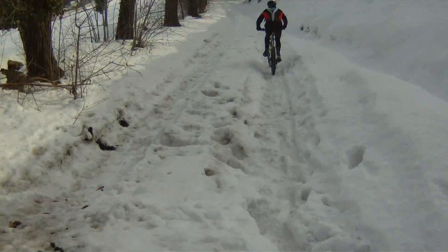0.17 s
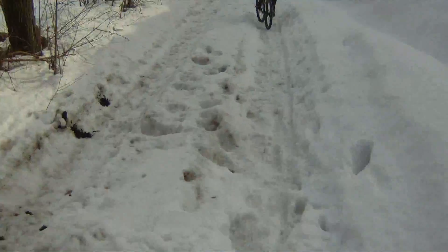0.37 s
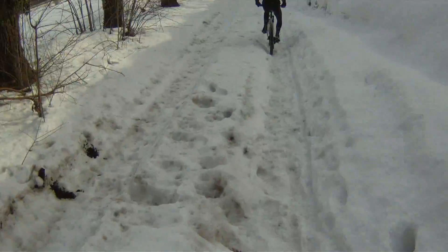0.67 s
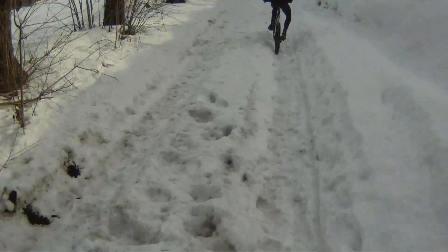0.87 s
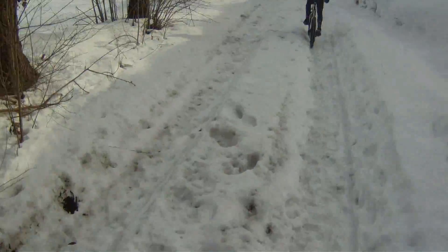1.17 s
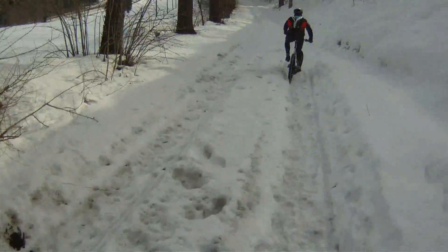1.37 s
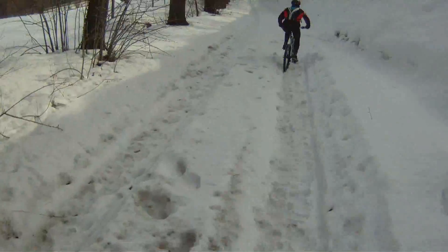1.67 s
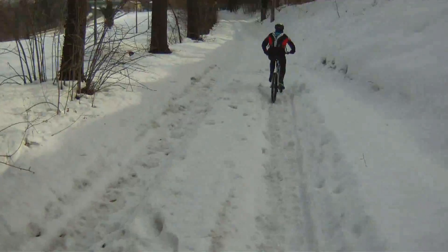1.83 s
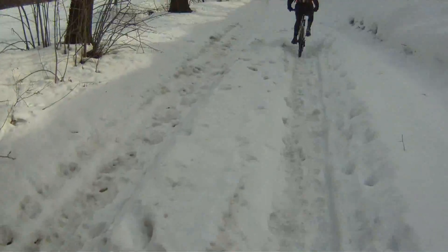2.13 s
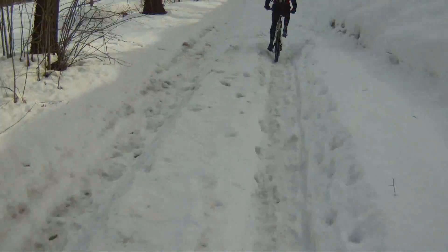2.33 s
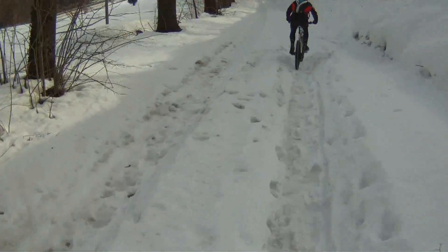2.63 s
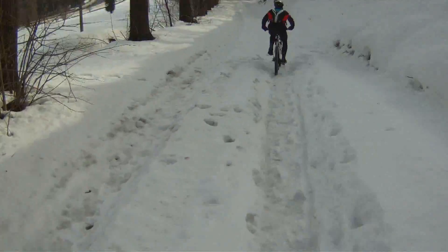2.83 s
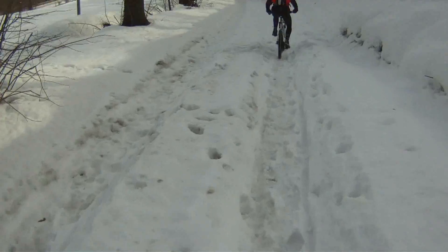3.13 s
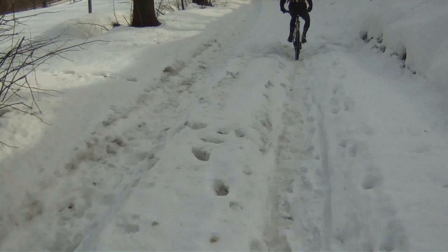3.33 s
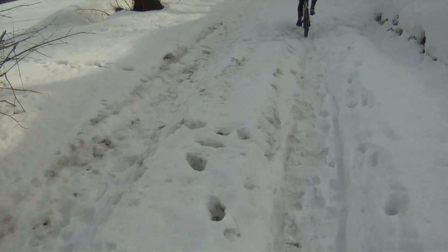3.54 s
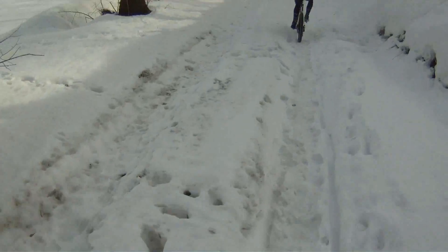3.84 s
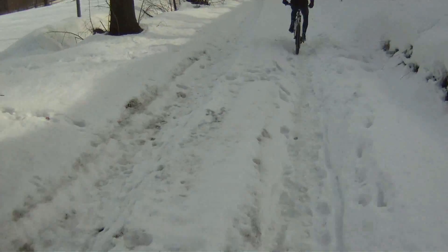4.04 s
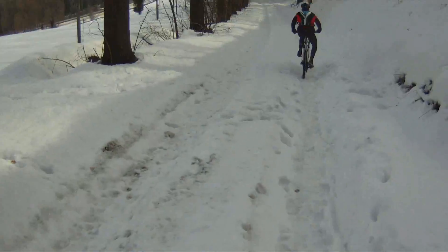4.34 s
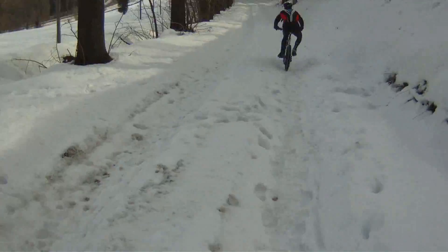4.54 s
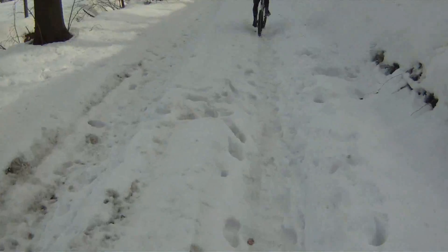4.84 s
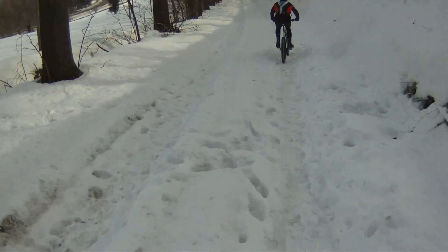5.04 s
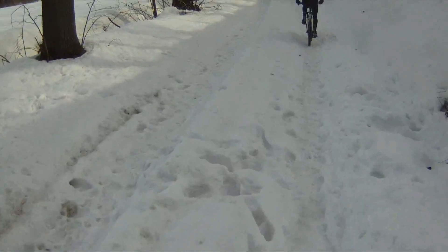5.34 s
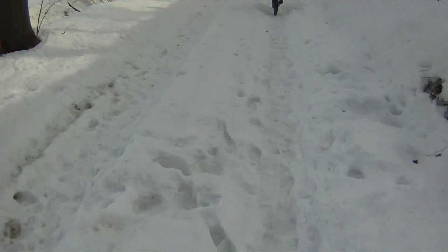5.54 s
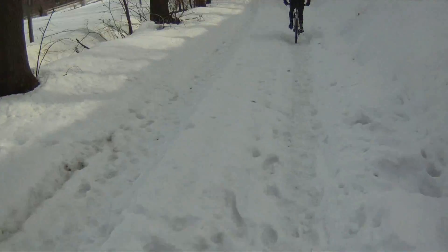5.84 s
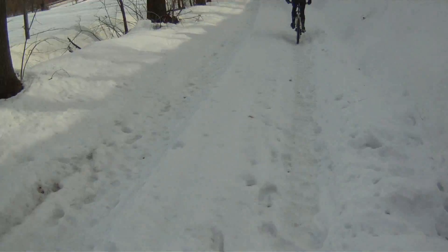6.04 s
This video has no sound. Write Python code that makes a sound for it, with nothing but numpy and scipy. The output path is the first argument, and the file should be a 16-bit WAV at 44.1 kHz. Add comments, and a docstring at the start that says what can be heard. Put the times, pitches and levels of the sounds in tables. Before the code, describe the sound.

A bike rolls over rough, snowy ground: constant uneven crunch, icy crackle and little dull blips as snow lumps give way. After a second of tyres alone, a loose part begins knocking, with short rattles and a few bright metal clacks, then eases mid-way before returning around four to five seconds. The on-bike microphone is close and dry, almost mono, with gusty low wind and faint electronic hiss and ticking.

```python
"""On a rutted track of packed snow, a mountain bike rolls along, heard from a camera riding on it.
Grain bursts shaped as dull crunch and icy grit make the tyres; swells are ridges, blips are bursting lumps.
Filtered noise makes wind, hiss and flying ice; filtered grains make soft low swells in the crunch.
A loose part knocks in ringing modes with rough snaps and rattling repeats; some knocks get a bright clack.
The mix is boxy, dry and nearly mono."""
import sys
import numpy as np
from scipy import signal
from scipy.fft import rfft, irfft
from scipy.io import wavfile
from scipy.ndimage import uniform_filter1d

SR = 44100
rng = np.random.default_rng(int(sys.argv[2]) if len(sys.argv) > 2 else 0)


def wav_out(sig):
    """Save sig, one row per channel (or a flat mono array), as 16-bit PCM at SR to the path in sys.argv[1]."""
    wavfile.write(sys.argv[1], SR, np.round(np.clip(np.atleast_2d(sig).T, -1, 1) * 32767).astype(np.int16))


N = 273420
T = np.arange(N) / SR


def amp(db):
    """Decibels to gain."""
    return 10 ** (np.asarray(db) / 20)


def unit(x):
    """Scales to an rms of one."""
    return x / np.sqrt(np.mean(x ** 2) + 1e-20)


def add(mix, s, sound):
    """Mixes a sound in at s seconds."""
    part = mix[max(round(s * SR), 0):][:len(sound)]
    part += sound[:len(part)]


def colour(x, spectrum, tilt_db=0, size=4096):
    """Minimum-phase filter with the given spectrum, so that each click rings after it lands."""
    hz, db = np.transpose(spectrum)
    tilted_db = db + tilt_db * np.log2(hz / hz[0])  # tilt in dB per octave
    octave = np.log2(np.fft.rfftfreq(size, 1 / SR) + 1)  # the 1 Hz shift avoids log of zero
    log_gain = np.log(amp(np.interp(octave, np.log2(hz), tilted_db)))
    circle = np.concatenate([log_gain, log_gain[-2:0:-1]])
    response = np.fft.ifft(np.exp(np.conj(signal.hilbert(circle)))).real
    return signal.oaconvolve(x, response[:size // 2])[:len(x)]


def wander(hz):
    """Smooth random curve of unit rms, its spectrum fading out around hz."""
    fade = np.exp(-(np.fft.rfftfreq(N, 1 / SR) / hz) ** 2)
    return unit(irfft(rfft(rng.standard_normal(N)) * fade, N))


def grains(per_s, spread_db):
    """Tiny fractures at random moments, most small and a few large."""
    size = amp(spread_db * np.minimum(rng.exponential(1, N), 4))
    polarity = rng.choice([-1, 1], N)
    return size * polarity * (rng.random(N) < per_s / SR)


def swell(at, db, length, rise=0.31):
    """Gain of one crush: a smooth rise over a share of its length, then a slower crumble."""
    phase = (T - at) / length
    near = (phase > -rise) & (phase < 1 - rise)
    side = np.where(phase[near] < 0, rise, 1 - rise)
    gain = np.zeros(N)
    gain[near] = np.cos(np.pi / 2 * phase[near] / side) ** 2
    return amp(db) * gain


# Tyres rolling on level snow between ridges: t/s, dull crunch level/dB, icy grit level/dB before trim
ROLLING_BED = [(0.0, -47, -56.5), (0.45, -49, -59), (0.75, -53.5, -65.5), (1.0, -46.5, -53.5),
               (1.22, -48, -65), (1.45, -47, -59.5), (2.1, -47.5, -58), (2.6, -48, -60.0),
               (3.15, -53.5, -64), (3.7, -47, -60.0), (4.3, -50.5, -61.5), (4.6, -46, -60), (5.7, -52, -64),
               (6.2, -47.5, -60.0)]
# A tyre crushes a ridge of snow: t/s at its height, level/dB, length/s, grit level/dB relative to crunch
RIDGE_CRUSHES = [(0.05, -45, 0.091, -9), (0.07, -44.5, 0.35, -12), (0.27, -41.5, 0.16, -10),
                 (0.356, -45.5, 0.17, -6), (0.522, -48, 0.059, -4.5), (0.595, -43, 0.15, -9.5),
                 (0.683, -42.5, 0.058, -22), (0.786, -41.5, 0.083, -15.5), (0.882, -41, 0.095, -10.5),
                 (0.978, -45.5, 0.202, -15), (1.025, -47, 0.074, -6), (1.103, -43.5, 0.15, -8),
                 (1.272, -42.0, 0.064, -7.5), (1.31, -41, 0.091, -12), (1.354, -43.5, 0.13, -14),
                 (1.44, -40, 0.083, -11.5), (1.523, -44.5, 0.16, -13), (1.641, -45.5, 0.088, -10.5),
                 (1.713, -42.5, 0.13, -14), (1.806, -42.0, 0.116, -11), (1.887, -39, 0.09, -12.5),
                 (1.977, -36, 0.027, -14), (2.157, -40.5, 0.039, -13), (2.194, -41.5, 0.1, -12),
                 (2.272, -38, 0.1, -13), (2.352, -45.5, 0.243, -14.5), (2.637, -46.5, 0.33, -18),
                 (2.682, -39, 0.064, -10.5), (2.793, -47, 0.11, -19), (2.899, -36.5, 0.055, -13.5),
                 (2.989, -41, 0.048, -12), (3.03, -43.5, 0.091, -12), (3.088, -41, 0.016, -12.5),
                 (3.203, -49.5, 0.18, -14), (3.301, -46, 0.06, -11), (3.371, -49.5, 0.16, -8.5),
                 (3.524, -44.5, 0.079, -11), (3.597, -42.5, 0.092, -18), (3.662, -44.5, 0.11, -10),
                 (3.726, -40, 0.051, -12), (3.783, -47, 0.23, -15), (3.999, -40.5, 0.1, -14.5),
                 (4.089, -42, 0.17, -15), (4.178, -42.5, 0.18, -13.5), (4.383, -44.5, 0.04, -6),
                 (4.44, -38.5, 0.077, -10.5), (4.559, -44.5, 0.2, -10), (4.724, -49.5, 0.36, -8),
                 (4.884, -49.0, 0.035, -4), (5.03, -42.5, 0.073, -10), (5.109, -44.5, 0.053, -10),
                 (5.193, -44, 0.2, -17), (5.333, -37, 0.16, -14.5), (5.425, -42, 0.12, -14),
                 (5.547, -45.5, 0.27, -12.5), (5.648, -45, 0.04, -8), (5.735, -44.5, 0.055, -14),
                 (5.79, -43.5, 0.16, -12.5), (5.914, -37.5, 0.037, -10.5), (6.01, -50, 0.41, -7.5),
                 (6.099, -41.5, 0.041, -15)]


def crushing():
    """How hard the tyres work the snow: rolling and ridge powers add up to gains for crunch and grit."""
    s, dull_db, icy_db = np.transpose(ROLLING_BED)
    dull_power = amp(np.interp(T, s, dull_db)) ** 2
    icy_power = amp(np.interp(T, s, icy_db)) ** 2
    for at, db, length, gritty_db in RIDGE_CRUSHES:
        power = swell(at, db, length) ** 2
        dull_power = dull_power + power
        icy_power = icy_power + power * amp(gritty_db) ** 2
    return np.sqrt(dull_power), np.sqrt(icy_power)


# Tone of the dull crunch: f/Hz, relative level/dB per Hz
CRUNCH_TONE = [(40, -28.5), (130, -19.5), (210, -15), (290, -7), (420, -8), (570, -6.5), (780, 0.5),
               (980, 0.5), (1250, -4.5), (1520, -11.5), (1900, -11), (2250, -43), (3200, -52), (8000, -46)]
# Tone of the icy grit: f/Hz, relative level/dB per Hz
GRIT_TONE = [(900, -17), (1600, -3), (1950, 11), (2350, 4), (2800, 2), (3150, 2.5), (3500, -0.5),
             (4200, 6.5), (4750, -0.5), (5450, 1), (6200, -14), (7400, -17.5), (9500, -20.5),
             (15000, -39.5)]


def tyres(dull, icy, clump_db=2.0, clump_hz=75, grit_trim_db=-1, shared=0.74, crust_db=-8):
    """Snow breaks in clumps of grains among sparse crust cracks: a dull crunch with icy grit on top."""
    clumps = amp(clump_db * wander(clump_hz))
    breaks = unit(grains(per_s=4500, spread_db=2.5) * clumps)
    breaks = breaks + amp(crust_db) * unit(grains(per_s=35, spread_db=1.8))
    crystals = unit(grains(per_s=6800, spread_db=4.5) * clumps)
    crunch = dull * unit(colour(breaks, CRUNCH_TONE))
    # The same breaks feed both layers, which glues grit to crunch
    grit = icy * unit(colour(crystals + shared * breaks, GRIT_TONE))
    return crunch + amp(grit_trim_db) * grit


# Wind on the camera: t/s, level/dB before trim and roughness
WIND_LEVEL = [(0, -62), (1.75, -65), (2.0, -66.5), (3.05, -64), (3.3, -59), (4.2, -69.5), (5.3, -64.5),
              (6.2, -69)]
# Tone of the wind: f/Hz, relative level/dB per Hz
WIND_TONE = [(15, 0.5), (40, -3.5), (90, -5), (170, -4.5), (350, -14.5), (1000, -60)]


def rumble(dull, trim_db=-1, gust_db=2, follow=0.43):
    """Wind shakes the camera as gusty low noise, more so where the tyres crunch harder."""
    roughness = unit(uniform_filter1d(dull, size=5000)) ** follow  # smoothed over 0.11 s
    level = roughness * amp(trim_db + np.interp(T, *np.transpose(WIND_LEVEL)))
    gusts = amp(gust_db * wander(hz=21))
    return level * unit(colour(rng.standard_normal(N), WIND_TONE) * gusts)


# Tone of the camera's electronics: f/Hz, relative level/dB per Hz
HISS_TONE = [(300, 0), (2500, 0), (7000, 0), (10000, -1), (14900, 0), (15600, -25)]
# The camera's two ticks in each picture: first t/s of each
TICK_STARTS = (.02235, .02335)


def hiss(level_db=-74.5, apart_db=-15, tick_db=-52, pictures_per_s=29.968):
    """The camera's electronics hiss, spread mostly in the treble, and click twice per picture."""
    common, apart = (unit(colour(noise, HISS_TONE)) for noise in rng.standard_normal((2, N)))
    apart = unit(np.gradient(apart))  # the slope favours treble
    ticks = np.zeros(N)
    for first in TICK_STARTS:
        moments = np.arange(first, T[-1], 1 / pictures_per_s)
        ticks[(moments * SR).astype(int)] = amp(tick_db)
    return ticks + amp(level_db) * (common + amp(apart_db) * np.array([apart, -apart]))


# Showers of loose ice thrown off the tread: t/s at the height, level/dB, length/s
ICE_SHOWERS = [(0.092, -73, 0.25), (1.003, -75, 0.33)]
# Tone of the flying ice: f/Hz, relative level/dB per Hz
ICE_TONE = [(2000, -30), (5500, -21), (7400, 6), (8600, -10), (10000, -3), (14000, -25), (16000, -27)]


def spray(icy, with_grit_db=-26, chip_at_s=0.2438, chip_db=-46, chip_decay_s=0.0013):
    """Fine crystals sizzle off the tread with the grit and in short showers; one larger chip ticks."""
    crystals = unit(colour(grains(per_s=5000, spread_db=3), ICE_TONE))
    level = amp(with_grit_db) * icy + sum(swell(*row) for row in ICE_SHOWERS)
    chip_decay = (T > chip_at_s) * np.exp(-abs(T - chip_at_s) / chip_decay_s)
    chip = amp(chip_db) * chip_decay * unit(colour(rng.standard_normal(N), ICE_TONE))
    return level * crystals + chip


# A lump of snow bursts under a tyre: t/s at the middle, peak level/dB before trim, pitch f/Hz
LUMP_BURSTS = [(.028, -30.5, 1010), (.333, -25.5, 820), (1.1425, -31.5, 865), (2.2405, -21, 850),
               (2.2851, -29, 1000), (2.6092, -25, 830), (2.6227, -27, 870), (2.6786, -23, 895),
               (2.8498, -23.5, 780), (3.0434, -34, 870), (3.0678, -34, 694), (3.1991, -36.5, 890),
               (3.541, -30, 980), (3.7143, -27, 730), (4.026, -26.5, 1020), (4.1583, -27.5, 920),
               (4.3552, -33, 940), (4.3785, -30, 920), (5.048, -23, 1010), (5.8745, -26, 950),
               (6.1184, -27, 950)]


def pops(cycles=0.73, trim_db=-1):
    """Each bursting lump is a dull blip: about two cycles of a cosine under a bell-shaped envelope."""
    out = np.zeros(N)
    t = np.arange(-SR // 200, SR // 200) / SR
    for s, db, hz in LUMP_BURSTS:
        bell = np.exp(-(t * hz / cycles) ** 2)
        add(out, s + t[0], amp(db + trim_db) * bell * np.cos(2 * np.pi * hz * t))
    return out


# Soft low swells in the crunch: t/s at the middle, level/dB
LOW_SWELLS = [(.325, -50), (1.691, -43.5), (1.98, -52.5), (3.051, -49), (3.79, -54), (4.10, -59),
              (5.25, -50)]
# Tone of the low swells, fullest around 300-500 Hz: f/Hz, relative level/dB per Hz
LOW_SWELL_TONE = [(80, -22), (200, -7), (290, 1), (480, 3.5), (750, -7), (1500, -21), (4000, -56)]


def low_swells(length_s=0.024):
    """The crunch swells softly and briefly in the lows: dull filtered grains under bell-shaped envelopes."""
    level = sum(amp(db) * np.exp(-((T - s) / length_s) ** 2) for s, db in LOW_SWELLS)
    return level * unit(colour(grains(per_s=1900, spread_db=4), LOW_SWELL_TONE))


def rattle(blows, level_db=-12, start_s=0.0029, decay_s=0.0057, per_s=1200, soft_hz=2300):
    """After each blow the loose part chatters on in soft, dull, irregular repeats."""
    out = np.zeros(N)
    t = np.arange(SR // 10) / SR
    soften = signal.butter(2, soft_hz, fs=SR)
    for s, blow in blows:
        hits = rng.standard_normal(len(t)) * (rng.random(len(t)) < per_s / SR)
        repeats = hits * (t > start_s) * np.exp(-t / decay_s)
        repeats = signal.lfilter(*soften, repeats / (np.linalg.norm(repeats) + 1e-9))
        add(out, s, blow)
        add(out, s, amp(level_db) * signal.fftconvolve(blow, repeats))
    return out


# A loose part knocks on the bike: t/s, level/dB before trim, brightness/dB per octave
PART_KNOCKS = [(1.068, -16.5, 0.5), (1.1012, -15.5, 0.5), (1.416, -20.5, -0.5), (1.5671, -25.5, -1),
               (1.7154, -24.5, 1), (1.8487, -11, 1.5), (2.0339, -16, 1.5), (2.561, -17, 1.5),
               (4.109, -25.5, -4), (4.2728, -22, 0.5), (4.5355, -21.5, -2.5), (4.7019, -21, -9.5),
               (4.7075, -20.5, 8), (4.9274, -13.5, 2), (4.946, -27.5, -8), (5.14, -22.5, -2.5),
               (5.3326, -23, 0)]
# Modes of the knocked part: f/Hz, level/dB before brightness and unevenness, t60/s
PART_MODES = [(800, -13, 0.039), (875, -15.5, 0.064), (1015, -10.5, 0.056), (1094, -23.5, 0.095),
              (1574, -13, 0.06), (1688, -6, 0.04), (1819, 7.5, 0.017), (2127, -1, 0.017),
              (2457, -10, 0.022), (2734, -0.5, 0.0092), (3234, -23.5, 0.026), (4047, -5, 0.012),
              (4460, -24, 0.013), (5220, -11, 0.004), (6050, -13, 0.0072), (8500, -9.5, 0.0033),
              (10850, -25, 0.0033), (13600, -32, 0.0034)]


def knocks(rise_s=0.0023, pivot_hz=1900, detune=0.011, uneven_db=2.28, trim_db=1.5):
    """A cushioned blow swells the modes over milliseconds, the high ones first; no two land alike."""
    blows = []
    t = np.arange(SR // 5)[:, None] / SR
    hz, mode_db, t60 = np.transpose(PART_MODES)
    rise = 1 - np.exp(-(t / rise_s) ** 2 * hz / pivot_hz)
    envelope = rise * np.exp(-np.log(1000) * t / t60)
    chances = rng.standard_normal((len(PART_KNOCKS), 2, len(hz)))
    for (s, db, bright_db), (sharp, strong) in zip(PART_KNOCKS, chances):
        tilt_db = bright_db * np.log2(hz / pivot_hz)
        heights = amp(trim_db + db + mode_db + uneven_db * strong + tilt_db)
        ring = np.sin(2 * np.pi * hz * (1 + detune * sharp) * t)
        blows.append((s, (heights * envelope * ring).sum(1)))
    return rattle(blows)


# Tone of the snap as a knock makes contact: f/Hz, relative level/dB per Hz before brightness
SNAP_TONE = [(700, -26), (1700, -0.5), (2700, 3.5), (4500, -3.5), (7000, -16), (12000, -24.5), (16000, -38)]


def snaps(re_knock_db=-8, rise_s=0.0015, decay_s=0.0013):
    """Each knock scrapes for an instant, a rough noise snap that is brighter for the brighter blows."""
    out = np.zeros(N)
    t = np.arange(SR // 20) / SR
    envelope = (1 - np.exp(-(t / rise_s) ** 2)) * np.exp(-t / decay_s)
    noises = rng.standard_normal((len(PART_KNOCKS), len(t)))
    for (s, db, bright_db), noise in zip(PART_KNOCKS, noises):
        scrape = unit(colour(noise, SNAP_TONE, bright_db))
        add(out, s, amp(db + re_knock_db) * envelope * scrape)
    return out


# Metal snaps on metal: t/s, level/dB, ring brightness/dB per octave, chatter level/dB before its decay
METAL_CLACKS = [(1.1019, -24.5, -14, -1.5), (1.106, -45, -8, -8), (1.849, -30, -12, -17),
                (2.0324, -26, 2, -11), (2.562, -35, -6, -14), (4.7012, -14.5, 4.5, -8),
                (4.7073, -26, -1, -11)]
# Modes of the metal: f/Hz, level/dB before brightness, t60/s
METAL_MODES = [(2460, -14, 0.016), (2964, -2, .018), (3400, -7, 0.019), (4210, 8.5, 0.0074),
               (4520, -0.5, 0.022), (5600, -14.5, 0.02), (5570, -23, 0.013), (5820, -8.5, 0.01),
               (7600, -12, 0.0095), (8500, -29, 0.0077)]
# Tone of the metal's chatter: f/Hz, relative level/dB per Hz
CHATTER_TONE = [(700, 0), (2500, 12.5), (4500, -5), (7000, 1), (11000, -3), (14000, -8), (16000, -7)]


def clacks(rise_s=0.00038, chatter_s=0.0019, pivot_hz=4200):
    """Hard contacts chatter for an instant and leave a short ring in the metal."""
    out = np.zeros(N)
    t = np.arange(SR // 10) / SR
    hz, mode_db, t60 = np.transpose(METAL_MODES)[:, :, None]
    decay = np.exp(-np.log(1000) * t / t60)
    rise = 1 - np.exp(-t / rise_s)
    for s, db, bright_db, chatter_db in METAL_CLACKS:
        heights = amp(mode_db + bright_db * np.log2(hz / pivot_hz))
        waves = np.sin(2 * np.pi * (hz * t + rng.random(hz.shape)))
        ring = (heights * decay * waves).sum(0)
        chatter = unit(colour(rng.standard_normal(len(t)), CHATTER_TONE)) * np.exp(-t / chatter_s)
        add(out, s, amp(db) * rise * (ring + amp(chatter_db) * chatter))
    return out


def scene():
    """The tyres are dead ahead; the knocks reach the left microphone a fraction of a sample early."""
    dull, icy = crushing()
    snow = tyres(dull, icy) + spray(icy) + pops() + low_swells()
    bike = knocks() + snaps() + clacks()
    lead = .08 * np.gradient(bike)  # adding the slope shifts the sound 0.08 sample earlier
    return snow + rumble(dull) + hiss() + np.array([bike + lead, bike - lead])


def record(dry, edge_hz=15700):
    """The camera's band limit: a steep lowpass."""
    lowpass = signal.firwin(301, edge_hz, window=("kaiser", 8), fs=SR)
    return signal.oaconvolve(dry, lowpass[None], "same", axes=1)


dry = scene()
out = record(dry)
wav_out(out)
```